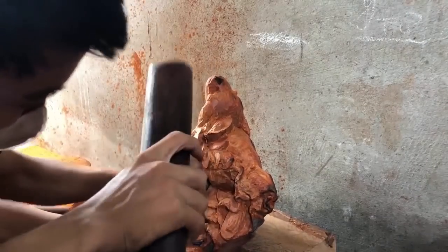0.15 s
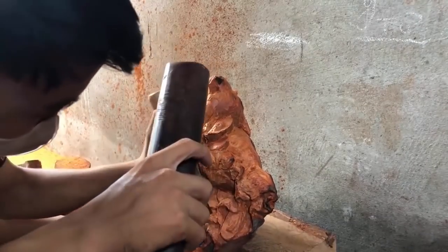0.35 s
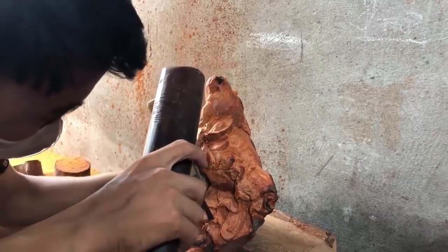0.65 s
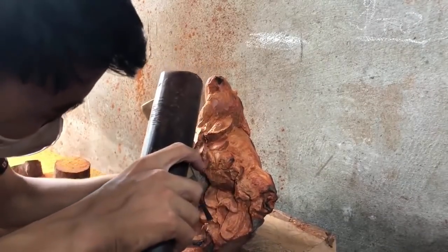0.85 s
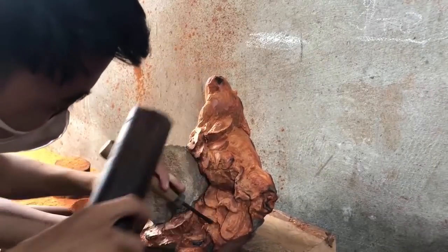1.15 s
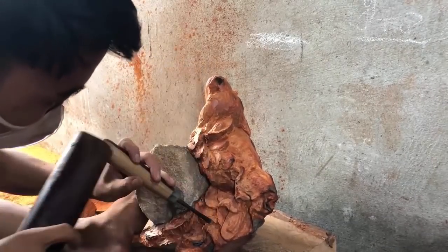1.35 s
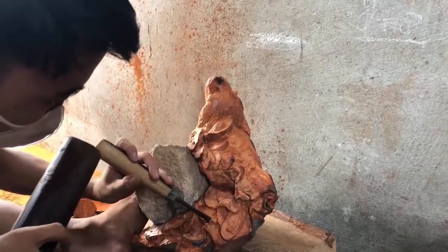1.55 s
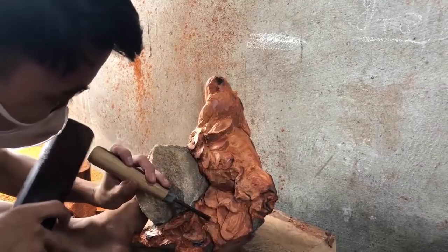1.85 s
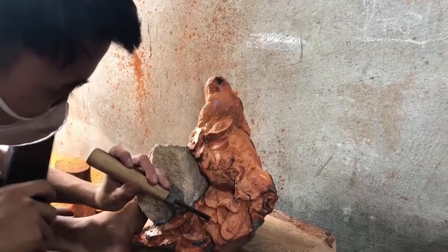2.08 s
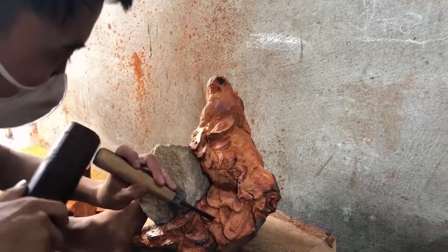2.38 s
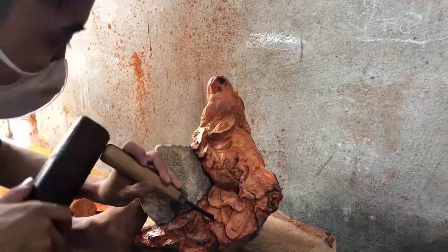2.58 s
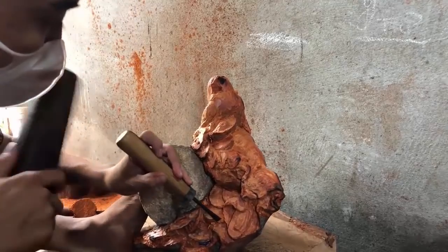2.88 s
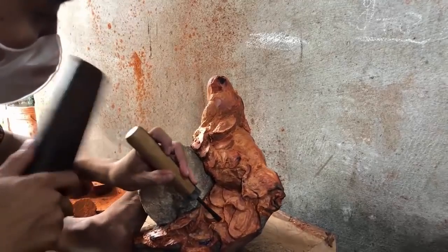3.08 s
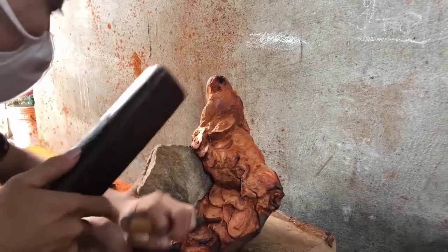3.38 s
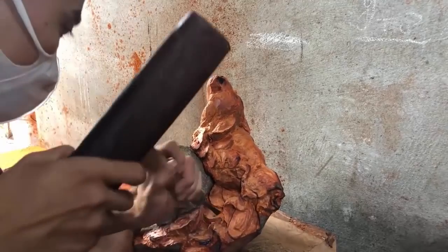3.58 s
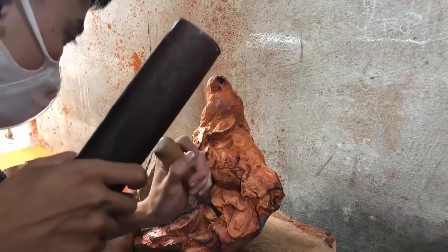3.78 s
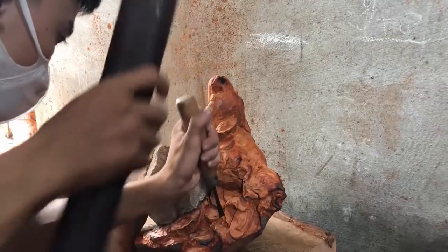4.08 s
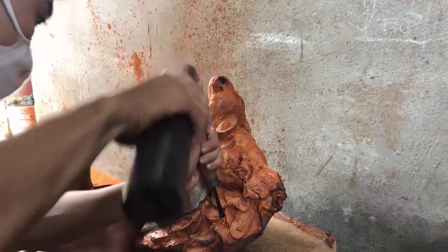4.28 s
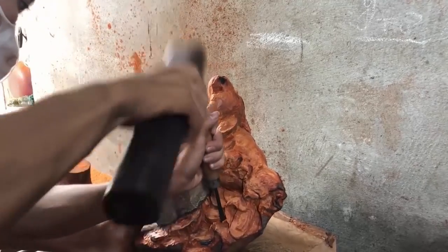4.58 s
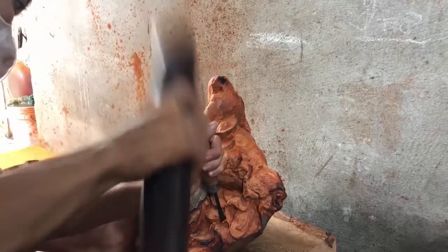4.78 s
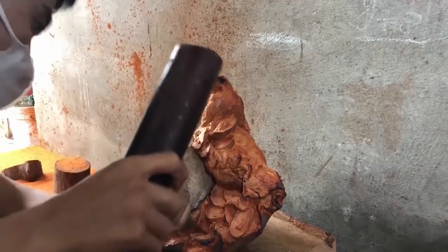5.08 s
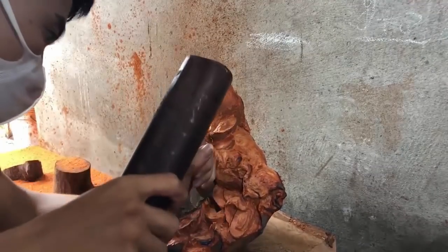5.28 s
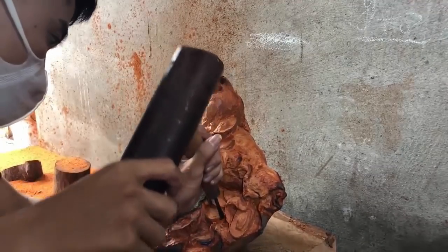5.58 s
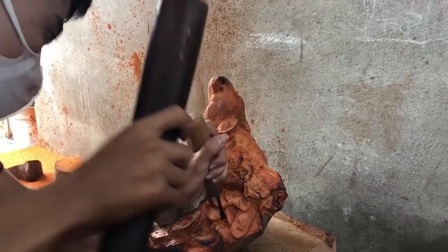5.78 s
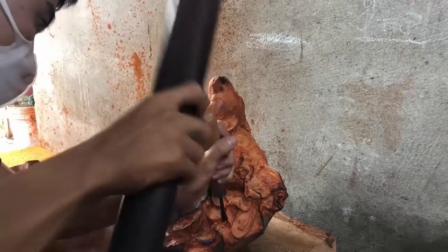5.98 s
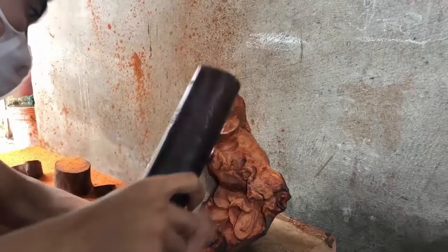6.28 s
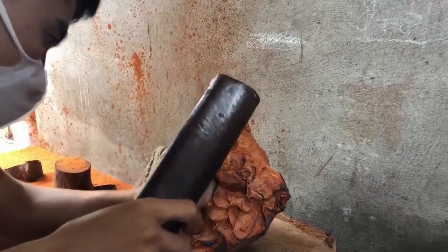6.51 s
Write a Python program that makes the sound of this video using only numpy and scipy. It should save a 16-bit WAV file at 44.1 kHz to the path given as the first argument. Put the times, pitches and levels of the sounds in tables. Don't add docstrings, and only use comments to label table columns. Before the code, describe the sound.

A phone an arm's length from a carving in a bare workshop hears a round hardwood mallet driving a chisel. A single sharp crack lands at 0.05 s, its short ring and wall reflection dying quickly. Then a pause with low wind buffeting, soft knocks on the microphone and a faint tool click at 1.2 s. From 2.2 to 3.2 s come six even blows about 0.2 s apart, duller on the whole, the last two hardest. After a windy rest, three blows fall at 4.3, 4.6 and 4.9 s, the middle one strongest. Tiny chip ticks appear near 5.2, 5.5 and 5.7 s. A last pair strikes at 5.9 and 6.2 s, followed by faint ticks until about 6.5 s. Each blow has a crunchy fibre edge, a very brief wood-and-steel ring and a short hard-room wash. Quiet distant hiss underneath sinks after some blows and creeps back.

```python
import sys
import numpy as np
from scipy import signal
from scipy.fft import rfft, irfft, next_fast_len
from scipy.io import wavfile
from scipy.ndimage import uniform_filter1d

SR = 44100
rng = np.random.default_rng(int(sys.argv[2]) if len(sys.argv) > 2 else 0)


def voltage_ratio(level):
    return 10 ** (np.asarray(level, float) / 20)


def inscribe(sig):
    pcm = np.round(np.clip(np.atleast_2d(sig).T, -1, 1) * 32767)
    wavfile.write(sys.argv[1], SR, pcm.astype(np.int16))


N = 293265

# frequency in Hz, level in dB per Hz.
HISS_COLOUR = [(150, -42.5), (250, -2.5), (373, -18), (406, -3), (527, -7), (595, -7.5), (984, -10.5),
               (1170, -6.5), (1490, -10), (2150, -11), (2650, -15), (6520, -21.5), (8460, -29),
               (15800, -31)]
# start in seconds, ghost in dB, dip of the gain in dB.
PHONE = [(0.051, -26, -15), (2.206, -67, -2), (2.413, -46, 0.5), (2.615, -57, -2.5), (2.815, -38, -7.5),
         (3.027, -33, -6.5), (3.221, -26, -3.5), (4.32, -33, 0.5), (4.566, -43, -1), (4.865, -32, -1.5),
         (5.915, -31, 0), (6.175, -22.5, -13.5)]

# frequency in Hz, level in dB per Hz.
BUFFET_COLOUR = [(8.8, -51.5), (15, -13.5), (36, -14.5), (54, -2.5), (71, -2), (110, -11), (140, -27.5),
                 (240, -120)]
# time in seconds, level in dB.
BREEZE = [(0, -48), (.22, -54), (.38, -43), (.62, -47), (.95, -43.5), (1.24, -47.5), (1.52, -54.5),
          (1.94, -40), (2.5, -48), (3.2, -48.5), (3.78, -41), (4.17, -42.5), (4.45, -51), (5.2, -50),
          (5.48, -43), (6.12, -50), (6.35, -59), (6.65, -48.5)]
# centre in seconds, buffeting in dB, length in seconds, flutter in dB over the buffeting.
GUSTS = [(0.506, -39, 0.051, -6), (1.088, -28, 0.046, -14), (1.33, -31, 0.25, -9.5),
         (1.594, -32.5, 0.047, -14), (1.806, -32.5, 0.092, -10), (1.903, -32, 0.029, -13),
         (2.06, -32, 0.037, -14), (2.149, -28.5, 0.042, -23), (2.235, -25.5, 0.024, -35),
         (2.337, -38.5, 0.14, -19), (2.59, -40.5, 0.079, 6.5), (2.873, -42, 0.17, -2),
         (2.982, -23.5, 0.025, -17), (3.067, -41.5, 0.094, -1), (3.652, -36.5, 0.05, -12),
         (3.853, -38.5, 0.042, -12), (4.003, -42, 0.05, -14), (4.074, -34, 0.034, -9),
         (4.155, -28, 0.032, -11.5), (4.24, -34.5, 0.046, -9), (4.358, -37, 0.085, 8.5),
         (4.638, -40, 0.16, -9.5), (4.777, -35, 0.067, -25), (4.92, -40, 0.15, 5), (5.067, -32, 0.04, -13),
         (5.355, -34.5, 0.12, -7), (5.584, -34, 0.12, -21), (5.823, -28.5, 0.057, -32),
         (5.977, -31, 0.036, -31), (6.077, -40, 0.064, -13)]
LULL_PUFFS = [
    (0.1, -46, 0.075, 8),
    (0.383, -47, 0.043, -1),
    (0.624, -42, 0.066, -12),
    (5.125, -52.5, 0.044, 3),
    (6.213, -51, 0.093, 7),
    (6.462, -45.5, 0.032, -7.5),
    (6.64, -45, 0.098, -7),
]
# start in seconds, level in dB, pitch in Hz.
KNOCKS = [(0.461, -52.5, 241), (0.596, -43.5, 193), (0.786, -49, 232), (1.029, -43.5, 210),
          (1.083, -51, 203), (1.288, -45, 215), (1.584, -49, 200), (1.797, -54, 234), (3.801, -45.5, 335),
          (4.048, -56, 580), (4.152, -41.5, 200), (4.212, -60, 202), (5.362, -43, 199), (5.795, -51, 200)]

# start in seconds, crack in dB, landing spot along the head (-1..1),
# spot around it (-1..1), treble tilt in dB per octave.
UPRIGHT_BLOWS = [
    (0.051, 1.5, 0.037, -0.71, -3),
    (4.32, 1, -0.6, 0.5, -2),
    (4.566, 2.5, 0.21, 0.61, -2.5),
    (4.865, -0.5, 0.66, 0.27, -1.1),
    (5.915, 1, 0.095, 0.31, -3),
    (6.175, 0.2, -0.18, -0.39, -2),
]
TILTED_BLOWS = [
    (2.206, 1.9, 0.15, .99, -5.5),
    (2.413, 5.5, 0.75, 0.25, -5),
    (2.615, 3.1, 0.47, -0.7, -1),
    (2.815, 1.9, 0.77, -.24, -3),
    (3.027, 6, -0.71, -0.28, -4.5),
    (3.221, 6.05, -0.64, -0.49, -4),
]
# frequency in Hz, level in dB, t60 in seconds.
UPRIGHT_MAIN = [(1203.3, 8.5, 0.037), (1501, 6, 0.016), (2919, 5, 0.034), (4940, 7, 0.021)]
TILTED_MAIN = [(1451, 7, 0.032), (1729, 8.9, 0.011), (3383, 4.3, 0.044), (5500, 8.1, 0.018)]
# frequency in Hz, level in dB re the crack, t60 in seconds.
UPRIGHT_LESSER = [(1710, -1.5, 0.0075), (2113, -21.5, 0.036), (2446, -21.5, 0.013), (3205, -16.5, 0.04),
                  (4230, -22.5, 0.056), (7140, -30, 0.014), (957, -13.5, 0.0095), (3504, -33.5, 0.091),
                  (6370, -27.5, 0.03), (8200, -26.5, 0.017), (9250, -23.5, 0.017)]
TILTED_LESSER = [(1167, -30.5, 0.025), (2066, -18, 0.015), (2590, -37, 0.027), (4540, -19, 0.018),
                 (6210, -27.5, 0.042), (7020, -48, .04), (2962, -10, 0.011), (4490, -33.5, .03),
                 (8700, -42.5, 0.045)]
# dB in the middle, dB per step along the head, dB per step around it.
UPRIGHT_SHAPE = [(-19.5, 7, 9), (-14, -7, 4.5), (-11, -11, -1), (-25, 23.5, -11), (-1.5, 5.5, -1),
                 (1.5, -1.5, 11.5), (11.5, 2, -1), (-3.5, -0.5, -6.5), (-5.5, 1.5, 5.5), (3, -0.5, -10.5)]
TILTED_SHAPE = [(-20.5, 7, 3.5), (-11, 1.5, -3), (-12, 8, -3), (-24, 3.5, -8.5), (2.5, 1, -4),
                (-3.5, -11.5, 9.5), (-3, 5.5, -3.5), (-1.5, 9.5, 4.5), (-1, 3, -4), (-2, 11, -9.5)]
UPRIGHT_FORCE = [0.46, 0.099, 0.44, 0.69, -0.96, -0.0039, -0.25, -0.27, -0.53, -2.3]
TILTED_FORCE = [0.16, 0.24, -.2, 0.85, 0.42, .4, -.8, .2, .6, -1.5]
# dB in the middle, dB per step along the head, dB per step around it.
UPRIGHT_THUD = (-27.5, 1.8, 4.9)
TILTED_THUD = (-29.5, -1.5, .1)
# frequency in Hz, level in dB.
CONTACT = [(120, -30.5), (300, -12.5), (700, -14), (1500, -4), (4000, -5), (6500, -18), (10000, -23.5),
           (12500, -23), (14500, -22.5), (16500, -27)]
# seconds after the blow, level in dB.
WALLS = [(.004, -2), (.012, -6.5), (.017, 1.5), (.03, 2.5), (.047, -1.5), (.075, -8), (.16, -23.5),
         (.3, -46), (.42, -71)]
# delay in seconds, dB over the wash, blur in seconds.
SLAPS = [
    (0.016, -6, 0.0017),
    (0.106, -34, 0.0095),
]

# start in seconds, level in dB, pitch in Hz, decay in seconds,
# broad click in dB.
TICKS = [(.72, -63, 13250, .004, -6), (1.2, -43, 4700, 0.0072, -8), (1.198, -49, 3900, 0.0057, -20),
         (1.199, -53, 8200, .005, -20), (1.199, -52, 14000, .005, -10), (1.589, -58, 8300, .003, -15),
         (3.499, -59, 13500, .006, 0), (5.155, -52, 13800, 0.0058, 0.5), (5.527, -48, 4160, .004, -18),
         (5.704, -58, 12000, .003, 3), (6.337, -52, 8200, .004, -5), (6.359, -60, 8520, 0.0034, -9),
         (6.454, -65, 8300, 0.00365, -15)]


def unit(x):
    return x / np.sqrt(np.mean(x ** 2))


def colour(x, points):
    hz, db = np.transpose(points)
    f = np.maximum(np.fft.rfftfreq(len(x), 1 / SR), 1)
    gain_db = np.interp(np.log(f), np.log(hz), db, left=-80, right=-80)
    return irfft(rfft(x) * voltage_ratio(gain_db), len(x))


def band(x, lo_hz, hi_hz):
    sos = signal.butter(2, [lo_hz, min(hi_hz, .45 * SR)], "bandpass", fs=SR, output="sos")
    return signal.sosfilt(sos, x)


def walk(rate):
    hold = int(SR / rate)
    levels = np.repeat(rng.standard_normal(N // hold + 1), hold)
    slewed = uniform_filter1d(uniform_filter1d(levels, hold), hold)
    return unit(slewed[:N])


def add(track, s, sound):
    i = int(round(s * SR))
    sound = sound[max(-i, 0):N - i]
    track[max(i, 0):max(i, 0) + len(sound)] += sound


def ducking():
    dip_s, recover_s = 0.13, 0.66
    s, _, dip_db = np.transpose(PHONE)[:, :, None]
    since = np.maximum(np.arange(N) / SR - s, 0)
    gain_db = dip_db * np.minimum(since / dip_s, 1) * np.exp(-(since / recover_s) ** 1.2)
    return voltage_ratio(np.min(gain_db, axis=0))


def workshop():
    hiss = unit(colour(rng.standard_normal(N), HISS_COLOUR))
    low = band(hiss, 200, 1000)
    wavering = hiss - low + low * voltage_ratio(0.5 * walk(4.3))
    return ducking() * voltage_ratio(-52) * wavering


def gusts(eddies):
    eddy_db, breeze_flutter_db, gust_lift_db, puff_db = 4, -4.5, -1.5, -16
    shake_db, shake_late_s, shake_s = -47, 0.018, 0.024
    t = np.arange(N) / SR
    buffet = voltage_ratio(np.interp(t, *np.transpose(BREEZE)) + eddy_db * eddies)
    flutter = buffet * voltage_ratio(breeze_flutter_db)
    for s, db, length_s, flutter_db in GUSTS + LULL_PUFFS:
        swell = voltage_ratio(db + gust_lift_db) * np.exp(-(1.97 * (t - s) / length_s) ** 2)
        buffet = buffet + swell
        flutter = flutter + swell * voltage_ratio(flutter_db)
    for s, _, _ in PHONE:
        flutter = flutter + voltage_ratio(shake_db) * np.exp(-((t - s - shake_late_s) / shake_s) ** 2)
    return buffet, flutter, flutter * voltage_ratio(puff_db)


def steady(x, share):
    envelope = np.abs(signal.hilbert(x, next_fast_len(N))[:N])
    swell = uniform_filter1d(envelope, size=900)
    return unit(x / swell ** share)


def wind():
    eddies = walk(18)
    buffet, flutter, puffs = gusts(eddies)
    deep = steady(colour(rng.standard_normal(N), BUFFET_COLOUR), 0.41) * voltage_ratio(0.5)
    quick_colour = [(70, -36.0), (100, 2.5), (200, -8), (260, -24.5)]
    quick = steady(colour(rng.standard_normal(N), quick_colour), 0.533) * voltage_ratio(-1.0)
    upper_colour = [(170, -9.5), (230, -1.5), (320, 6.5), (480, -9.5), (900, -23.5)]
    upper = unit(colour(rng.standard_normal(N), upper_colour))
    upper = upper * voltage_ratio(1.03 * eddies + 1.5 * walk(49) - 3)
    out = buffet * deep + flutter * quick + puffs * upper
    t = np.arange(2500) / SR
    shape = t / 0.0042 * np.exp(1 - t / 0.0053)
    for s, db, hz in KNOCKS:
        sinking = np.sin(2 * np.pi * hz * t * (1 - 4 * t))
        partner = 0.82 * np.sin(2 * np.pi * 0.5 * hz * t)
        add(out, s, voltage_ratio(db + 6.5) * shape * (sinking + partner))
    return out


def rings(modes, t):
    hz, db, t60 = np.transpose(sorted(modes))[:, :, None]
    sign = (-1.) ** np.arange(len(modes))[:, None]
    fade = np.exp(-np.log(1000) * t / t60)
    off_hz = hz * (1 + 0.0028 * rng.standard_normal(hz.shape))
    return np.sum(voltage_ratio(db) * sign * fade * np.sin(2 * np.pi * off_hz * t), axis=0)


def blow(crack_db, ring_db, main, lesser, tilt_db, thud_db):
    t = np.arange(4096) / SR
    landing_db = ring_db[len(main):]
    modes = [(hz, db + hit_db, t60) for (hz, db, t60), hit_db in zip(main, ring_db)]
    shift_db = np.r_[landing_db, 1.5 * rng.standard_normal(len(lesser) - len(landing_db))]
    for (hz, db, t60), shift in zip(lesser, shift_db):
        bright_db = (tilt_db + 1) * np.log2(hz / 2000)
        modes.append((hz, crack_db + db + shift + bright_db, t60))
    ring = rings(modes, t) * (1 - np.exp(-t / 0.0012))
    contact = []
    for hz, db in CONTACT:
        treble_db = (tilt_db + 3) * max(np.log2(hz / 2000), 0)
        contact.append((hz, db + treble_db + (thud_db + 31.5) * (hz < 800)))
    click = voltage_ratio(crack_db + 3.5) * colour(np.eye(1, len(t), 64)[0], contact)
    grit = band(colour(rng.standard_normal(len(t)), contact), 3300, 17000)
    grit_fade = np.exp(-t / 0.0015) + 0.55 * np.exp(-(t / 0.0065) ** 2)
    return ring, click, voltage_ratio(crack_db - 5) * grit * grit_fade


def walls(shared):
    wall_db, treble_db_s, same = -33.5, -53, 0.62
    t = np.arange(len(shared)) / SR
    dense = same * shared + np.sqrt(1 - same ** 2) * rng.standard_normal(len(t))
    shape = voltage_ratio(wall_db + np.interp(t, *np.transpose(WALLS), left=-60))
    for s, db, blur_s in SLAPS:
        shape = shape + voltage_ratio(wall_db + db) * np.exp(-((t - s) / blur_s) ** 2)
    bass = colour(dense, [(20, -26.5), (4000, -2.5), (7000, -11.0), (12000, -33.5)])
    return shape * (bass + (dense - bass) * voltage_ratio(treble_db_s * t))


def mallet():
    aside = .35
    ghost_s, ghost_fade_s, earlier_s = 1024 / SR, .006, .24
    out = np.zeros(N)
    shared = rng.standard_normal((2, int(.42 * SR)))
    upright = UPRIGHT_MAIN, UPRIGHT_LESSER, UPRIGHT_SHAPE, UPRIGHT_FORCE, UPRIGHT_THUD
    tilted = TILTED_MAIN, TILTED_LESSER, TILTED_SHAPE, TILTED_FORCE, TILTED_THUD
    blows = [(row, upright) for row in UPRIGHT_BLOWS] + [(row, tilted) for row in TILTED_BLOWS]
    blows.sort(key=lambda pair: pair[0][0])
    for (row, face), (_, ghost_db, _) in zip(blows, PHONE):
        s, crack_db, along, around, tilt_db = row
        main, lesser, shape, force, thud = face
        spot = np.array([1, along, around])
        ring_db = np.array(shape) @ spot + np.array(force) * (crack_db - 2.5)
        ring, click, grit = blow(crack_db, ring_db, main, lesser, tilt_db, spot @ np.array(thud))
        i = np.arange(len(ring))
        prompt_click = np.roll(click, -56) * (i < 2000)
        direct = ring - aside * band(ring, 2500, 7000) + prompt_click + grit
        add(out, s, direct)
        wash = signal.fftconvolve(ring, walls(shared[0]))
        add(out, s, wash)
        if s < earlier_s:
            add(out, s - earlier_s, wash)
        add(out, s, voltage_ratio(12) * signal.fftconvolve(click, walls(shared[1])))
        ghost = band(direct, 600, 7900) * np.exp(-i / SR / ghost_fade_s)
        add(out, s - ghost_s, voltage_ratio(ghost_db) * ghost)
        add(out, s - 600 / SR, voltage_ratio(-25.5) * band(direct, 930, 4000)[600:0:-1])
    return out


def ticks():
    out = np.zeros(N)
    t = np.arange(1300) / SR
    for s, db, hz, decay_s, click_db in TICKS:
        noise = rng.standard_normal(len(t))
        ring = band(noise, .95 * hz, 1.05 * hz)
        click = unit(ring) + voltage_ratio(click_db) * unit(band(noise, 2500, 16000))
        add(out, s, voltage_ratio(db) * click * np.exp(-t / decay_s) * (1 - np.exp(-t / 0.00067)))
    return out


def scene():
    return (workshop() + wind() + mallet() + ticks())[None]


def low_pass(x):
    return signal.sosfilt(signal.butter(12, 16820, fs=SR, output="sos"), x)


def record(dry):
    pinch_depth, pinch_late_s, pinch_s, ceiling = .5, 0.01, 0.0034, .64
    narrow, wide = (signal.ellip(8, .2, 60, hz, fs=SR, output="sos") for hz in (15750, 16600))
    late = np.arange(N) / SR - np.array(PHONE)[:, :1] - pinch_late_s
    pinch = 1 - pinch_depth * np.exp(-(late / pinch_s) ** 2).max(axis=0)
    cut = signal.sosfilt(narrow, dry * pinch)
    held = cut / (1 + np.abs(cut / ceiling) ** 4) ** 0.18
    return low_pass(signal.sosfilt(wide, held))


dry = scene()
out = record(dry)
inscribe(out)
```